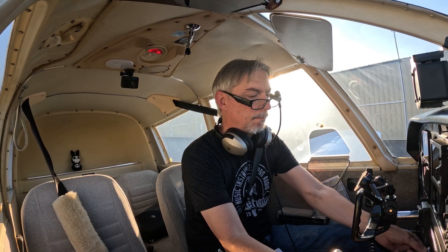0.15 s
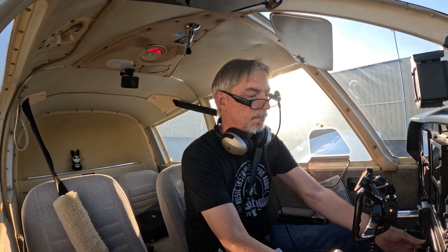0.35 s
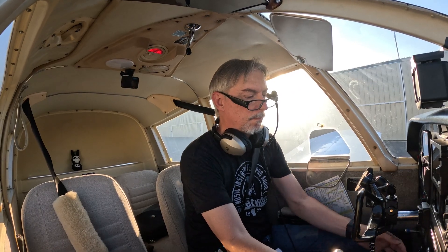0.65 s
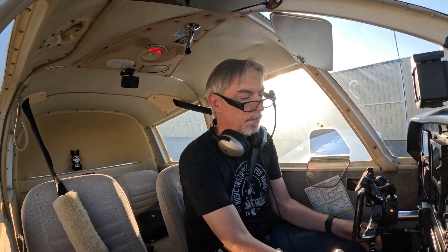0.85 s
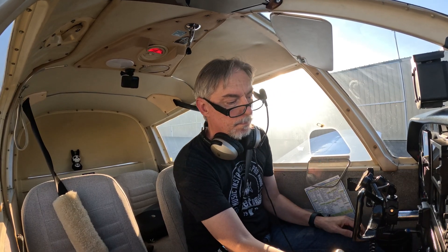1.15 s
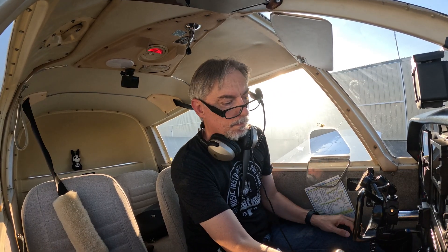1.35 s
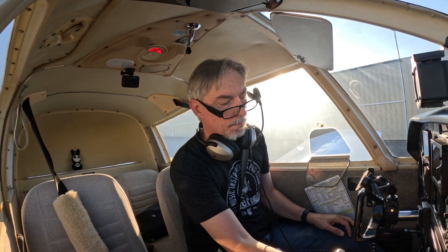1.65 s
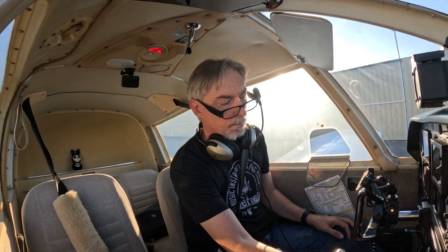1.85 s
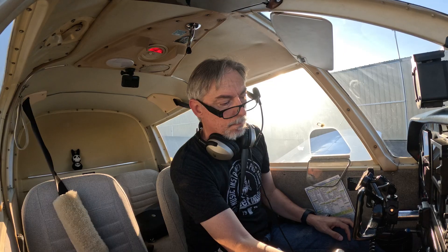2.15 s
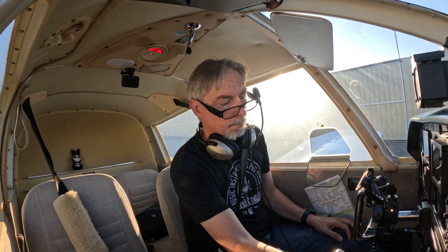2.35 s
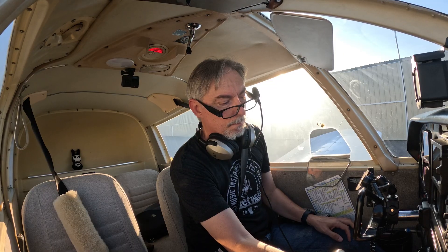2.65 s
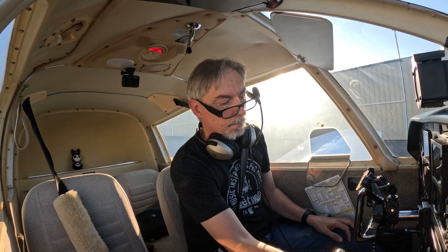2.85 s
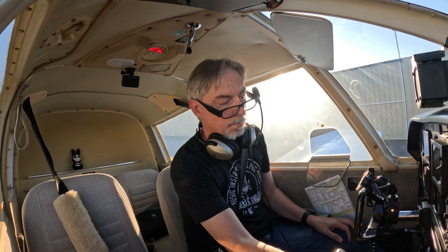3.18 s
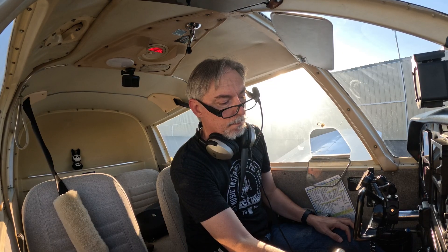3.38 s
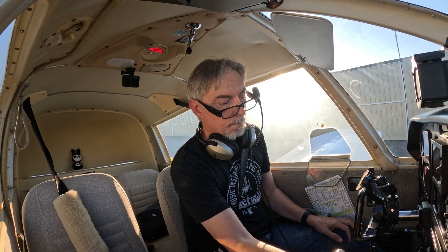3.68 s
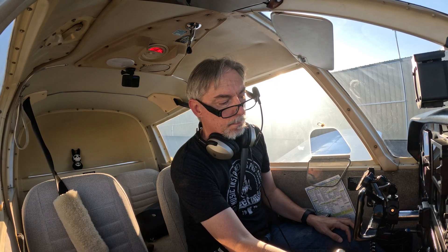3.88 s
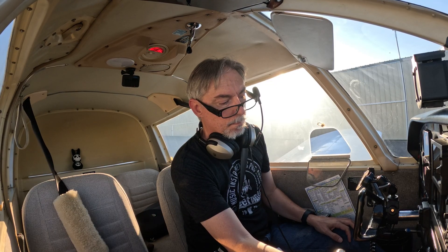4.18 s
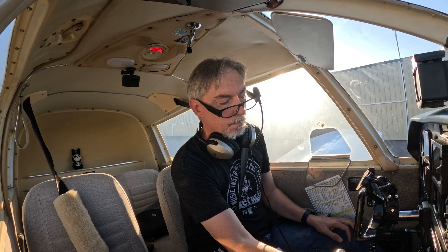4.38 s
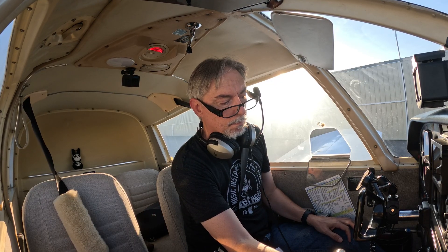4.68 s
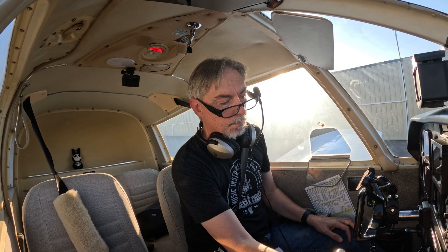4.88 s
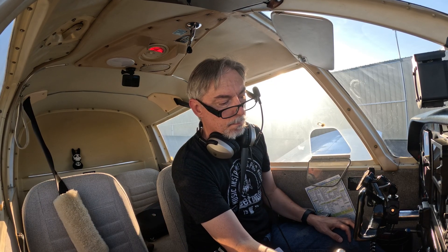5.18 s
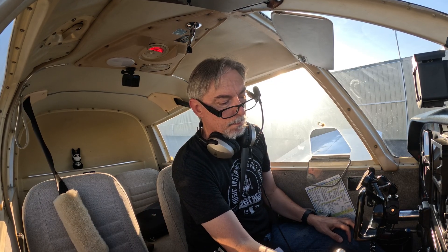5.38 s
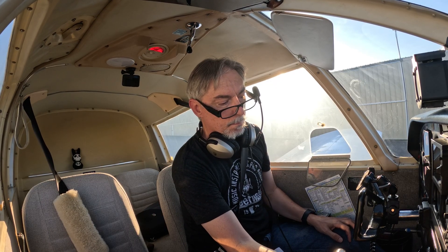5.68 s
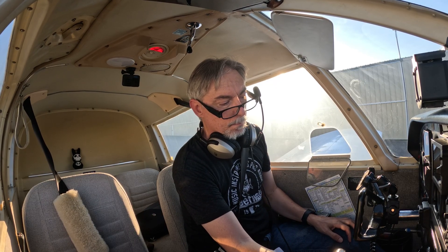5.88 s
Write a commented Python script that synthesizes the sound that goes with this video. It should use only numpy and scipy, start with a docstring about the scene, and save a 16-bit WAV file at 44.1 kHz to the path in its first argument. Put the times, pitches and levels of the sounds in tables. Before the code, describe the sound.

Inside a light plane cockpit, a piston engine lurches to life, loose fittings clattering, then speeds up and settles into a deep throbbing idle.

```python
"""Inside a small aircraft cabin a four-cylinder engine has just caught: it lurches, rattles and climbs to idle.
Firings boom in the cabin air as tones at firing orders and bark through firewall panels as noise in puffs.
Propeller wash and rocking on the mounts are low noise; loose fittings buzz, knock and sing in their modes.
"""
import sys
import numpy as np
from scipy import signal
from scipy.fft import rfft, irfft
from scipy.io import wavfile
from scipy.ndimage import uniform_filter1d

SR = 44100
rng = np.random.default_rng(int(sys.argv[2]) if len(sys.argv) > 2 else 0)


def to_wav(sig):
    """Store sig (one row per channel, or 1-D mono) as 16-bit WAV at the path in sys.argv[1].

    Samples outside -1..1 are clipped; the rate is SR.
    """
    pcm = np.clip(np.atleast_2d(sig), -1, 1) * 32767
    pcm = np.round(pcm).astype(np.int16)
    wavfile.write(sys.argv[1], SR, pcm.T)  # frames by channels


N = 265916
HZ = np.maximum(np.arange(N // 2 + 1) * SR / N, 1)   # FFT bins
SMOOTH_FROM_PER_S = 28.6   # firing rate from which the engine runs smoothly


def amp(db):
    """dB to gain."""
    return 10 ** (np.asarray(db) / 20)


def rms_one(x):
    """Scale to rms 1."""
    return x / np.sqrt(np.mean(x ** 2) + 1e-20)


def in_time(rows):
    """Columns of a curve table, one value per sample."""
    s, *columns = np.transpose(rows)
    return [np.interp(np.arange(N) / SR, s, column) for column in columns]


def at_hz(points):
    """A spectrum table read at every FFT bin, on a log frequency axis."""
    hz, value = np.transpose(points)
    return np.interp(np.log(HZ), np.log(np.maximum(hz, 1)), value)


def bumps(rows):
    """Sum of Gaussian rises or dips in dB."""
    t = np.arange(N) / SR
    return sum(db * np.exp(-.5 * ((t - s) / width_s) ** 2) for s, db, width_s in rows)


def ring(clicks, hz, t60_s):
    """Damped resonance: a unit click starts a sine of height 1 before decay."""
    r = 10 ** (-3 / (t60_s * SR))
    w = 2 * np.pi * hz / SR
    return signal.lfilter([0, np.sin(w)], [1, -2 * r * np.cos(w), r * r], clicks + 1e-18)


def fade(clicks, t60_s):
    """A unit click becomes an exponentially dying envelope."""
    return signal.lfilter([1], [1, -10 ** (-3 / (t60_s * SR))], clicks + 1e-18)


def coloured(x, spectrum):
    """Filter by a spectrum table; rms 1."""
    return rms_one(irfft(rfft(x) * amp(at_hz(spectrum)), N))


def firings(turn, spread_db):
    """Strength in dB of the firing under way: random, capped one spread above full."""
    strength_db = np.minimum(rng.normal(0, spread_db, 256), spread_db)
    return strength_db[np.floor(turn).astype(int) % 256]


def propeller_wash(level_db):
    """Turbulent wash over the skin: low noise."""
    # wash spectrum: f/Hz, density/dB
    wash_spectrum = [(30, -65.5), (60, -17.5), (85, 0.5), (105, 0.5), (150, 1.5), (200, -3), (300, -8),
                     (450, -23), (1200, -100)]
    return amp(level_db) * coloured(rng.standard_normal((2, N)), wash_spectrum)


def mount_rocking(level_db):
    """Engine rocking on its mounts: noise at still lower frequencies."""
    # rocking spectrum: f/Hz, density/dB
    rocking_spectrum = [(4, -60), (8, -12), (16, 1), (23, -5), (31, -10), (40, -4), (50, -9), (62, -9),
                        (78, -8), (100, -24), (300, -100)]
    return amp(level_db) * coloured(rng.standard_normal((2, N)), rocking_spectrum)


def puffs(turn, fall):
    """Exhaust puff envelope: rounded swell per firing, stronger for some cylinders; rms 1."""
    # puff strength per cylinder in firing order: level/dB
    cylinder_db = np.array([4, 1, -1.5, 0])
    shifted = turn + .4   # the puff starts ahead of its peak
    part = shifted % 1 / fall
    evening = np.interp(turn, [60, 110], [1.8, .75])   # cylinders even out as they warm
    puff_db = evening * cylinder_db[np.floor(shifted).astype(int) % 4]
    puff_db = puff_db + firings(shifted, spread_db=1.5)
    return rms_one(uniform_filter1d(part * np.exp(-part) * amp(puff_db), size=350))


def bark(turn, level_db):
    """Exhaust through the firewall: broad roar, plus panels that throb with the puffs and are struck by firings."""
    # roar spectrum: f/Hz, density/dB
    bark_spectrum = [(100, -69), (200, -3.5), (370, -3), (700, -5), (1000, -3), (1440, -11.5),
                     (1800, -14.5), (2300, -16.5), (2800, -44), (4000, -33), (6000, -85)]
    # firewall and floor panels: f/Hz, width/Hz, gain/dB, share that throbs/0-1, blow/gain, throb lag/s
    panels = [(424, 24, 5, .3, 1.1, 0), (595, 60, 2, .35, .1, 0), (875, 36, -1, .7, .2, 0),
              (948, 40, 7, .8, .6, 0), (1140, 36, 1, .5, .2, 0), (1304, 34, 4, .55, .35, 0),
              (1955, 30, 6, .4, .1, .011), (2006, 42, 12, .55, .2, .011), (2230, 50, 1, .3, 0, .008),
              (3575, 60, 5, .4, 0, 0), (4012, 24, 13, .1, 0, 0)]
    # blow of each cylinder on the panels, in firing order: level/dB
    cylinder_blow_db = np.array([0, -12, -6, -11])
    puff = puffs(turn, fall=.2)
    roar = rfft(rng.standard_normal((2, N)) * (.76 + .24 * puff))
    panel_noise = .75 * rng.standard_normal((2, N))

    stroke = np.floor(turn + .14)   # the blow lands just after the puff peaks
    blow_db = cylinder_blow_db[stroke.astype(int) % 4] + firings(stroke, spread_db=1.5)
    blows = rms_one(np.diff(stroke, prepend=0) * amp(blow_db))

    steady, throbbing = rfft(panel_noise), rfft(panel_noise * puff)
    struck = rfft(blows) * [[1], [0]]   # direct sound only
    ringing = 0
    for hz, width_hz, db, throb, blow, lag_s in panels:
        off = 1j * (HZ - hz) / width_hz
        soft_blow = blow * struck / (1 + off)   # the ring swells in over a few cycles
        lagged = (throb * throbbing + soft_blow) * np.exp(-2j * np.pi * HZ * lag_s)
        ringing = ringing + amp(db) / (1 + 2 * off) * ((1 - throb) * steady + lagged)
    return amp(level_db + 2.5) * rms_one(irfft(amp(at_hz(bark_spectrum)) * (roar + ringing), N))


def buzz(turn, level_db):
    """Countless tiny contacts of trim and instruments over a hiss; a higher level makes them denser."""
    # buzz spectrum: f/Hz, density/dB
    buzz_spectrum = [(1200, -83), (2300, 0), (3000, -6), (3600, -6.5), (4400, -15.5), (5200, -16),
                     (7000, -20), (7700, -22), (8400, -29), (10300, -27), (12000, -32), (14000, -39),
                     (15600, -53)]
    shaking = np.clip((level_db + 54) / 12, .02, 1)
    sizes = amp(2.6 * np.minimum(rng.exponential(1, N), 4))
    contacts = rng.random(N) < 120 * shaking / SR   # up to 120 per s
    ticks = fade(sizes * contacts, t60_s=.036)
    hiss = rng.standard_normal((2, N)) * (2.9 + ticks) * (1 + .3 * puffs(turn, fall=.25))
    hiss /= np.sqrt(uniform_filter1d(np.mean(hiss ** 2, axis=0), size=8000))   # slow level from level_db alone
    return amp(level_db + 1.5) * coloured(hiss, buzz_spectrum)


def boom(turn, speed):
    """Firing orders as clean tones in the cabin air, varying with each burn and sagging at set times."""
    # weak firings and longer sags of the boom: t/s, change/dB, width/s
    sags = [(.45, -9, .14), (3.95, -7, .03), (4.295, -14, .022), (4.47, -5, .015), (4.85, -4.5, .018),
            (5.228, -4.5, .015), (5.7, -5, .02)]
    # cabin response to an order at its momentary pitch: f/Hz, level/dB
    cabin_response = [(20, -22), (24.5, -23), (26, -19), (32, -21.5), (35, -13.7), (41, -29), (55, -19),
                      (63, -21), (67.5, -27), (69.3, -41), (73, -21), (84, -20.5), (92, -29), (100, -27),
                      (104, -21.5), (108, -29), (111.5, -16.5), (120, -24), (130, -25), (140, -28),
                      (160, -35), (173, -24), (190, -40), (222, -31), (240, -45)]
    # orders, fractions from uneven cylinders: multiple of firing rate, level/dB, change when smooth/dB
    orders = [(.5, -11, 2), (.75, -12, -4), (1, 0, 0), (1.25, -11, 2), (1.5, -14, 1), (1.75, -12, -2),
              (2, 0, 0), (2.25, -12, -12), (2.75, -15, -6), (3, -12, 1), (4, -12, 0), (5, -22, 11),
              (6, -19, 4), (8, -12, 0)]
    # cabin air modes, each delaying tones above it by half a cycle: f/Hz
    modes_hz = [30.5, 32.5, 43, 51, 52.5, 60, 71, 108, 160]
    mode_width_hz = 1.5

    burn_db = uniform_filter1d(firings(turn, spread_db=.8), size=1200) + bumps(sags)
    smooth = np.clip((speed - SMOOTH_FROM_PER_S) / 3, 0, 1)
    response_hz, response_db = np.transpose(cabin_response)
    grid_hz = np.arange(10, 300, .25)
    lag_cycles = .13
    for mode_hz in modes_hz:
        lag_cycles = lag_cycles + .25 + np.arctan((grid_hz - mode_hz) / mode_width_hz) / (2 * np.pi)

    tones = 0
    for k, order_db, change_db in orders:
        pitch_hz = k * speed
        tone_db = order_db + change_db * smooth + np.interp(pitch_hz, response_hz, response_db)
        cycles = k * turn - np.interp(pitch_hz, grid_hz, lag_cycles)
        tones = tones + amp(tone_db) * np.cos(2 * np.pi * cycles)
    return np.sqrt(2) * amp(burn_db - .5) * tones


def light_knocks(turn, speed):
    """Knock rows for firings that by chance jar a fitting, only while the engine runs rough."""
    chance = .15   # share of rough firings that knock
    peak_db, dull_db, spread_db = -46, -40, 3
    luck = rng.random(200)
    late, peak, dull = rng.standard_normal((200, 3)).T
    at = np.minimum(np.searchsorted(turn, np.arange(200) + .1 * late), N - 1)
    rows = np.array([at / SR, peak_db + spread_db * peak, dull_db + spread_db * dull]).T
    return rows[(luck < chance) & (speed[at] < SMOOTH_FROM_PER_S)]


def rattles(lurch_db):
    """Knock rows set off by lurches: the harder the lurch, the denser and louder."""
    peak_db, dull_db = -54, -41   # before the lurch and a random 0-8 dB are added
    when, luck, peak, dull = rng.random((70, 4)).T
    s = .8 * when
    rise_db = lurch_db[(s * SR).astype(int)]
    rows = np.array([s, peak_db + rise_db + 8 * peak, dull_db + rise_db + 8 * dull]).T
    return rows[luck < rise_db / 24]


def knocks(rows):
    """Loose fittings struck: short crack, lingering rattle, dull thud and ringing modes per knock."""
    # fitting modes: f/Hz, level/dB, t60/s
    fitting_modes = [(970, -4, .09), (1157, -3, .07), (2030, -1, .13), (2240, -5, .08), (2750, -5, .05),
                     (3530, -5, .03), (4000, -7, .05), (5300, -8, .015), (7380, -9, .015),
                     (10250, -15, .015)]
    s, peak_db, dull_db = np.transpose(rows)
    at = (s * SR).astype(int)
    out = np.zeros((2, N))
    for hz, db, t60_s in fitting_modes:
        clicks = np.zeros((2, N))
        blow_db = dull_db - 11 if hz < 2500 else peak_db - 9   # low modes follow the thud
        clicks[:, at] = amp(blow_db + db + rng.normal(0, 3, (len(at), 2)).T)
        out += ring(clicks, hz, t60_s)

    bursts = ((peak_db - 9.5, [2300, 6000], .035),    # crack
              (peak_db - 20, [2200, 8000], .16),      # rattle
              (peak_db - 28, [6000, 8500], .03),      # crack, treble
              (peak_db - 33, [7500, 13000], .04),     # crack, top
              (dull_db - 2, [700, 2500], .07))        # thud
    for db, band_hz, t60_s in bursts:
        clicks = np.zeros(N)
        clicks[at] = amp(db)
        envelope = uniform_filter1d(fade(clicks, t60_s), size=90)
        band = signal.butter(3, band_hz, "band", fs=SR, output="sos")
        out += envelope * rms_one(signal.sosfilt(band, rng.standard_normal((2, N))))
    return out


def sings():
    """Jarred fittings: a short run of uneven touches keeps one mode ringing."""
    # singing modes: t/s, length/s, f/Hz, level/dB
    sing_rows = [(.094, .012, 1150, -33), (.136, .006, 970, -31), (.148, .012, 1800, -35),
                 (.15, .01, 1000, -30), (.15, .03, 600, -33), (.193, .008, 969, -24),
                 (.193, .006, 2750, -38), (.222, .01, 2100, -35), (.262, .02, 3950, -47),
                 (.294, .03, 2150, -38), (.308, .01, 650, -33), (.31, .02, 3950, -46),
                 (.338, .012, 2600, -35), (.346, .03, 2020, -33), (.366, .03, 3950, -43),
                 (.37, .025, 1150, -27), (.378, .02, 370, -29), (.385, .012, 600, -29),
                 (.447, .012, 650, -31), (.5, .015, 970, -30), (.597, .02, 950, -30),
                 (.632, .01, 1000, -32)]
    out, t = np.zeros((2, N)), np.arange(SR) / SR   # all start in the first second
    for s, length_s, hz, db in sing_rows:
        run = (t > s) & (t < s + length_s)
        touches = run * (rng.random((2, SR)) < .03) * rng.standard_normal((2, SR))
        tone = ring(touches, hz, t60_s=.035)
        out[:, :SR] += amp(db) * tone / np.sqrt(np.mean(tone[:, run] ** 2) + 1e-20)
    return out


def stereo_ports(direct, diffuse):
    """Two close ports share the direct sound, shifted in phase; diffuse sound enters them in antiphase."""
    # left-right likeness: f/Hz, likeness/0-1
    likeness = [(100, 1), (600, .97), (900, .89), (1250, .82), (1700, .58), (2100, .92), (3200, .65),
                (4200, .35), (5500, .62), (8000, .35), (10000, .1), (11500, .65), (14000, .2)]
    # phase by which left leads: f/Hz, lead/rad
    left_lead = [(120, 0), (170, -.33), (400, -.6), (800, -1.1), (2500, -1.2), (4000, -.7), (4800, 0)]
    # left over right: f/Hz, level/dB
    left_over_right = [(60, 1.3), (250, 1.6), (550, 2.8), (1200, 3.4), (2100, 4.4), (4000, 2.4),
                       (8000, 4.6)]
    # peaks and dips from cabin and dashboard: f/Hz, width/Hz, gain/dB
    cabin_colour = [(378, 110, -2.5), (501, 17, 0.5), (786, 110, -1.5), (1206, 13, -1), (1820, 66, -1),
                    (2185, 38, -4), (3160, 120, 0), (3550, 130, 2.5), (4220, 100, 0), (4330, 50, 5),
                    (4600, 130, 0), (5250, 280, 1), (5750, 150, 2)]
    alike = np.clip(at_hz(likeness), 0, 1)
    half_lead = np.exp(.5j * at_hz(left_lead))
    tilt = amp(at_hz(left_over_right) / 2)
    cabin = amp(sum(db / (1 + (2 * (HZ - hz) / width_hz) ** 2) for hz, width_hz, db in cabin_colour))
    shared = cabin * rfft(direct) * np.sqrt((1 + alike) / 2)
    own = cabin * rfft(diffuse) * np.sqrt((1 - alike) / 2)
    left = (shared + own) * half_lead * tilt
    right = (shared - own) / half_lead / tilt
    return irfft(np.array([left, right]), N)


def scene():
    """Engine, wash and fittings summed as direct and diffuse sound, then heard at two ports."""
    # firing rate: t/s, rate/(1/s)
    speed_curve = [(0, 19.9), (.4, 22.32), (.9, 24.12), (1.7, 25.09), (2.7, 27.7), (3.4, 27.76),
                   (4.6, 34.12), (5.05, 35.03), (6.03, 34.46)]
    # noise drives: t/s, wash/dB, rocking/dB, bark/dB, buzz/dB
    noise_curves = [(0, -31.5, -19.5, -35, -47), (.55, -23.5, -14, -33.5, -46.5),
                    (.93, -23.5, -28.5, -35.5, -51), (1.4, -28.5, -19, -32.5, -49.5),
                    (1.9, -25.5, -21, -31, -46), (2.4, -27.5, -19.5, -31, -46.5),
                    (3.2, -32.5, -23, -31.5, -48), (3.84, -31.5, -18, -30.5, -48.5),
                    (4.3, -29.5, -18.5, -28, -49), (4.9, -33.5, -22.5, -28, -48),
                    (6.03, -32, -26, -28.5, -48.5)]
    # lurches as the engine catches: t/s, rise/dB, width/s
    lurches = [(.03, 2.5, 0.034), (.17, 5, 0.047), (.23, -1.5, 0.033), (.37, 5.5, .034), (.46, 4.5, 0.015),
               (.55, 9, 0.053), (.63, 5.5, 0.02), (.72, 1, 0.041)]
    # knocks at set times, loud and soft: t/s, peak drive/dB, dull drive/dB
    set_knocks = [(0.0238, -36, -20.5), (0.1116, -36, -48), (0.1415, -40, -38), (0.1535, -28, -29),
                  (0.18, -40, -37), (0.2125, -36, -38), (0.197, -41, -28), (0.225, -38, -30),
                  (0.25, -51, -28), (0.2942, -54, -27), (0.3411, -21, -26), (0.3844, -51, -41),
                  (0.4229, -29, -37), (0.445, -28, -33), (0.4904, -29, -27), (0.5088, -28, -26),
                  (0.5312, -18.5, -23.5), (0.5625, -28, -30), (0.585, -27, -26), (0.608, -22.5, -42),
                  (0.635, -26, -41), (0.6958, -26, -42), (0.652, -33, -45), (0.7347, -33, -40),
                  (0.7592, -35, -43), (0.8889, -48, -32), (0.9398, -32.5, -37), (0.976, -46, -37),
                  (1.0146, -40, -44), (1.0395, -50, -40), (1.1, -49, -32), (1.2316, -42, -32),
                  (1.274, -37, -40), (1.3169, -34.5, -50), (1.3987, -35, -33), (1.5584, -34.5, -33),
                  (1.601, -34, -30.5), (1.64, -33, -41), (1.686, -50, -40), (1.7978, -40, -46),
                  (1.8442, -34, -39), (1.9195, -33, -40), (1.8834, -34, -32), (2.0188, -29, -29),
                  (2.1774, -33, -37), (2.2204, -31, -32), (2.2987, -32, -45), (2.7077, -35, -39),
                  (2.7985, -41, -38), (3.2021, -38, -45), (3.276, -33, -50), (3.3104, -34, -50),
                  (3.4281, -34, -47), (3.4481, -37, -42), (5.676, -53, -33.5)]
    bark_follows, rocking_follows = .72, .21   # shares of the lurch rise in dB

    speed, = in_time(speed_curve)
    turn = np.cumsum(speed) / SR - .21   # firings so far; the strongest cylinder fires at 0
    wash_db, rocking_db, bark_db, buzz_db = in_time(noise_curves)
    lurch_db = bumps(lurches)

    sound = propeller_wash(wash_db)   # rows: direct, diffuse
    sound += mount_rocking(rocking_db + rocking_follows * lurch_db)
    sound += bark(turn, bark_db + bark_follows * lurch_db)
    sound += buzz(turn, buzz_db + lurch_db)
    sound[0] += boom(turn, speed)
    sound += knocks(np.vstack([set_knocks, light_knocks(turn, speed), rattles(lurch_db)]))
    sound += sings()
    return stereo_ports(*sound)


def record(dry):
    """Round loud peaks, then cut the top: 70 dB down from 16 kHz."""
    rounded = .92 * np.tanh(dry / .9)
    return signal.sosfilt(signal.cheby2(12, 70, 16000, fs=SR, output="sos"), rounded)


dry = scene()
out = record(dry)
to_wav(out)
```